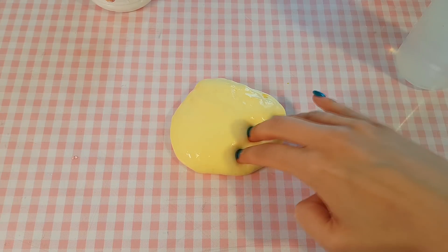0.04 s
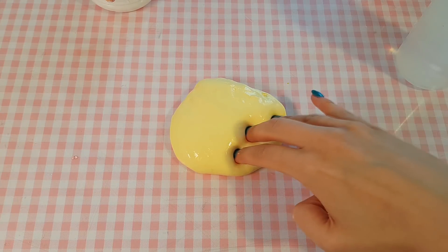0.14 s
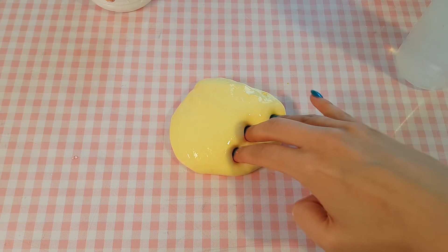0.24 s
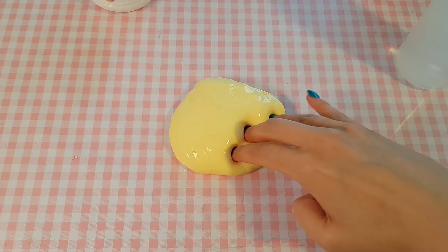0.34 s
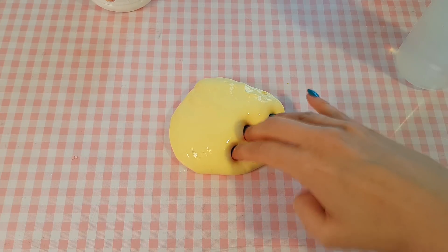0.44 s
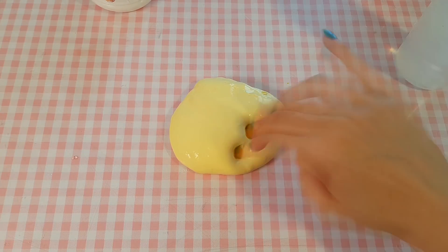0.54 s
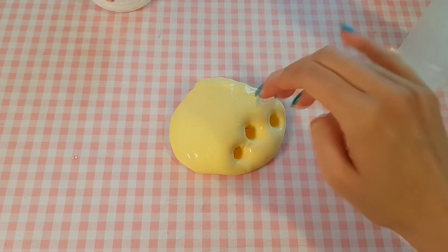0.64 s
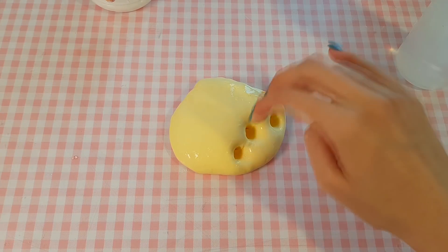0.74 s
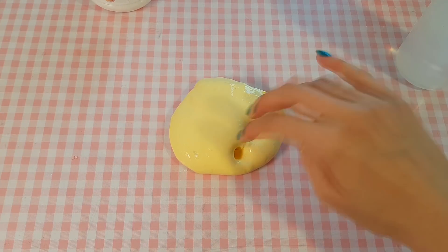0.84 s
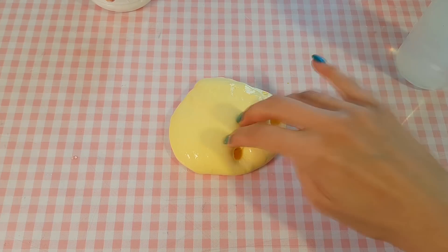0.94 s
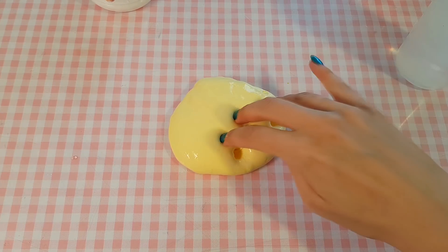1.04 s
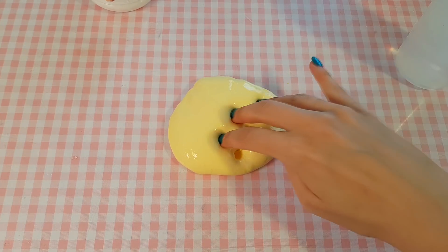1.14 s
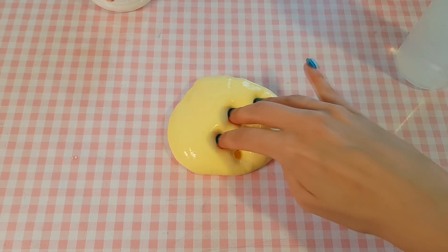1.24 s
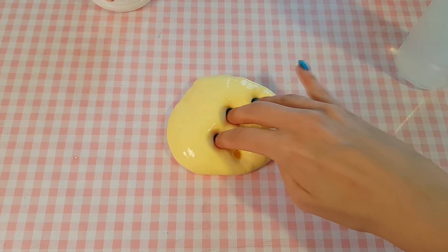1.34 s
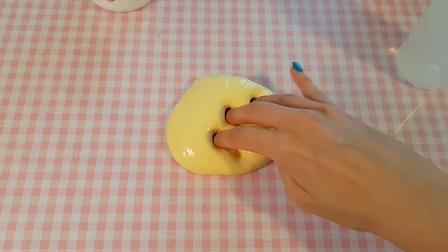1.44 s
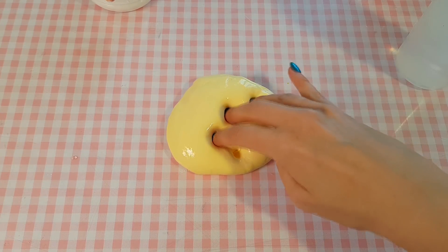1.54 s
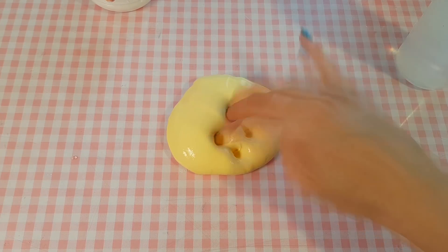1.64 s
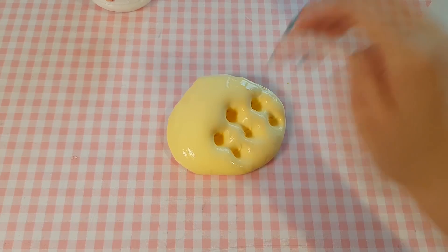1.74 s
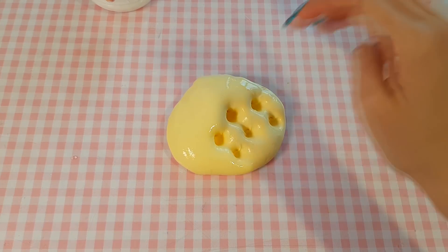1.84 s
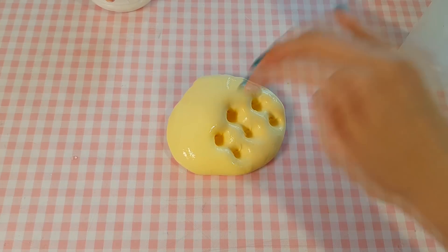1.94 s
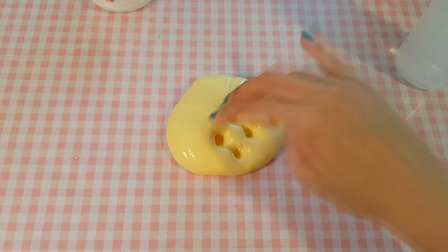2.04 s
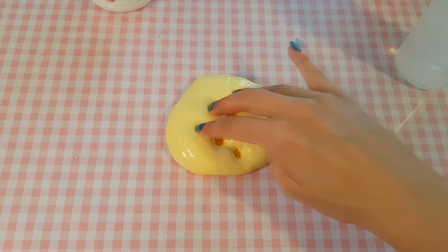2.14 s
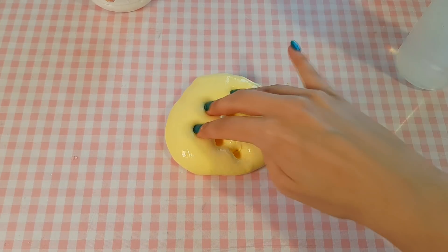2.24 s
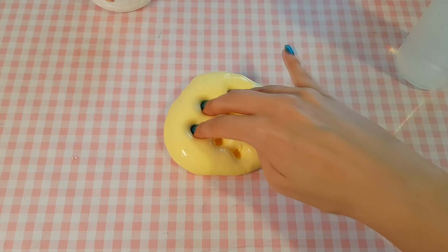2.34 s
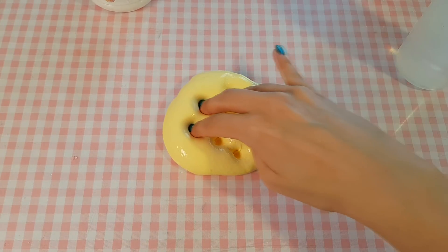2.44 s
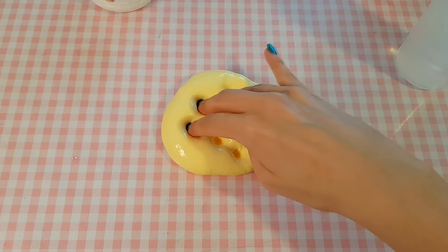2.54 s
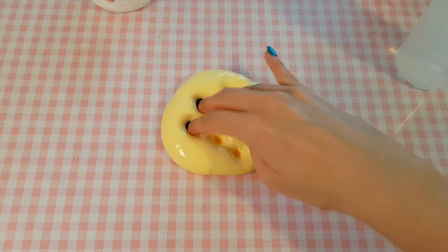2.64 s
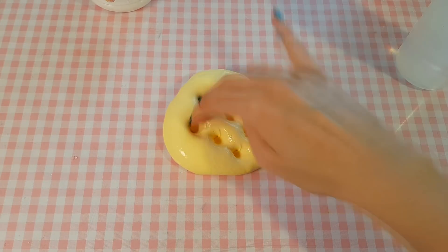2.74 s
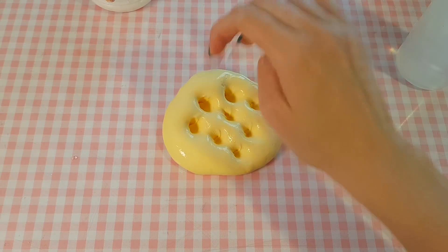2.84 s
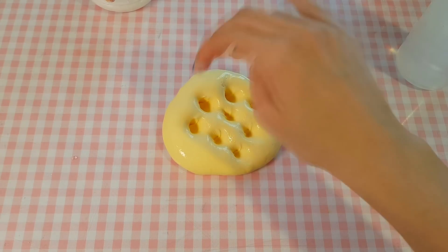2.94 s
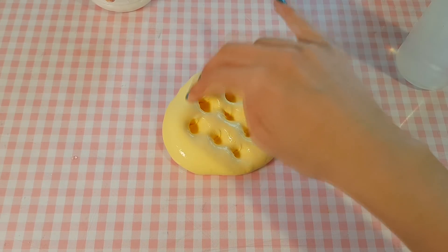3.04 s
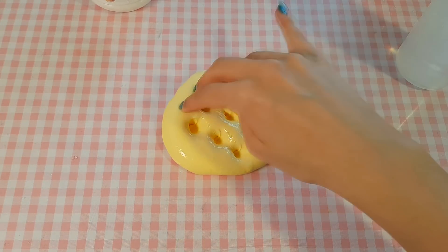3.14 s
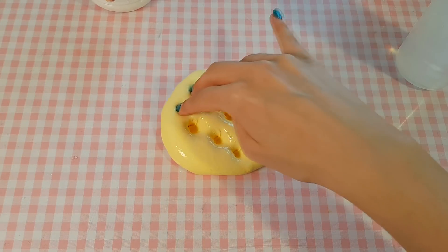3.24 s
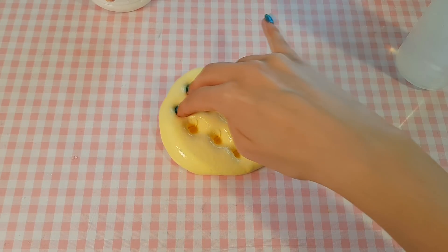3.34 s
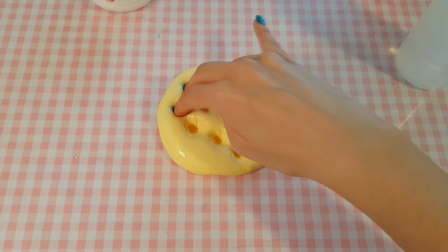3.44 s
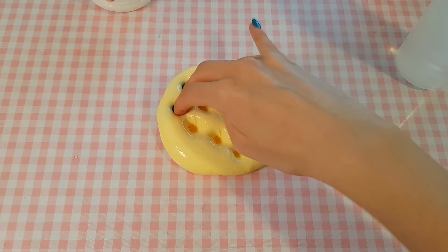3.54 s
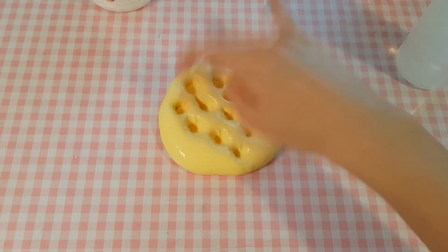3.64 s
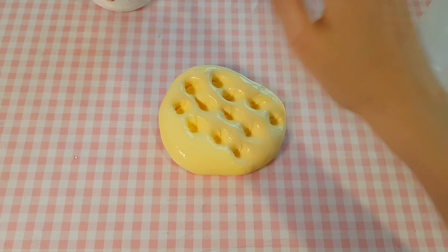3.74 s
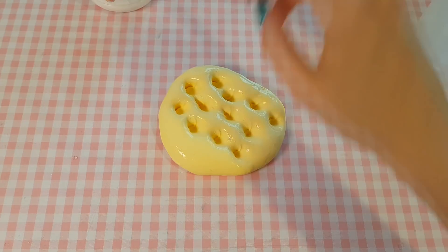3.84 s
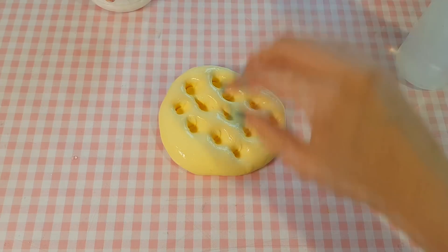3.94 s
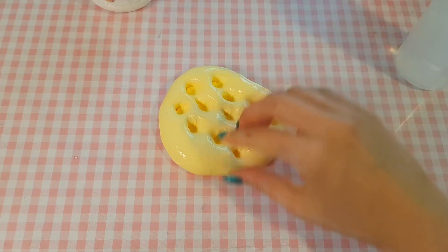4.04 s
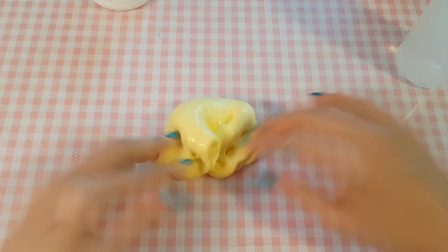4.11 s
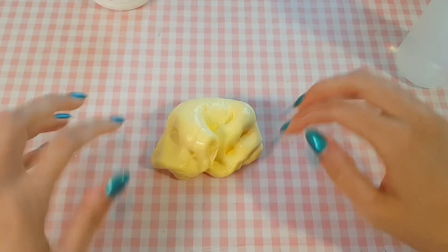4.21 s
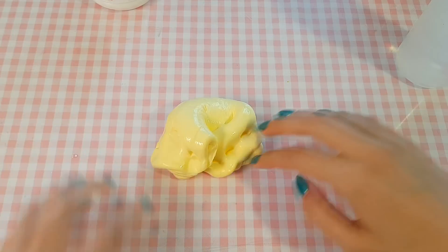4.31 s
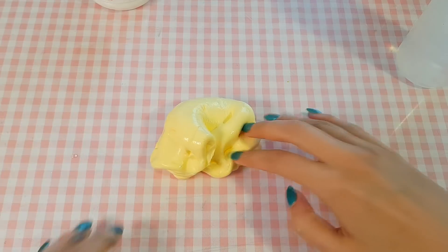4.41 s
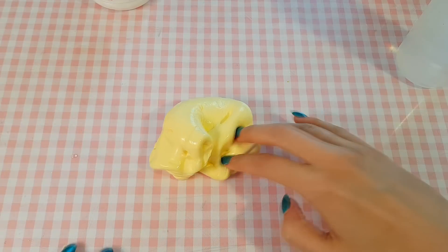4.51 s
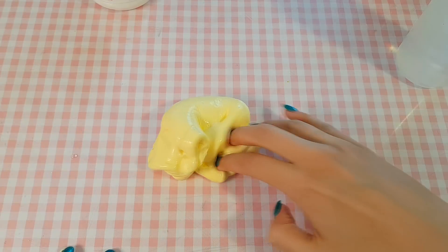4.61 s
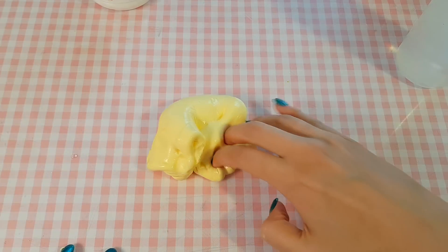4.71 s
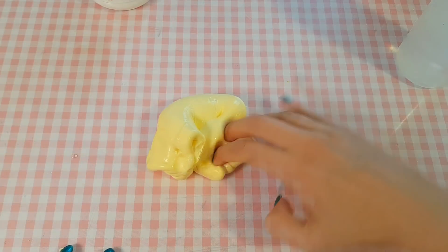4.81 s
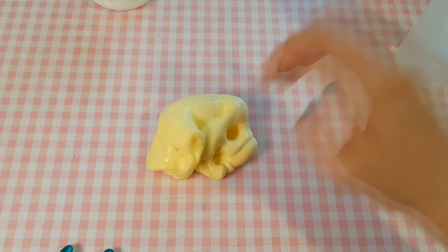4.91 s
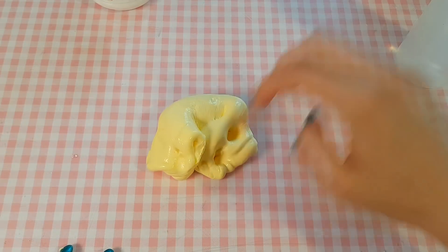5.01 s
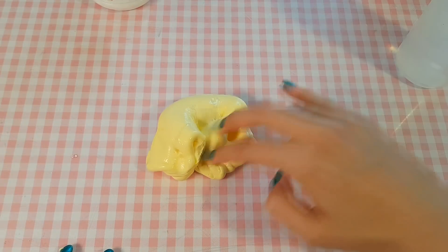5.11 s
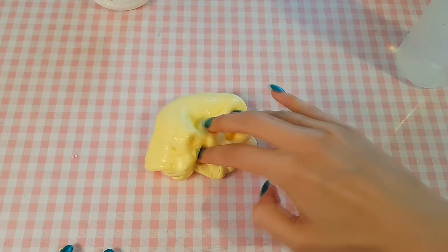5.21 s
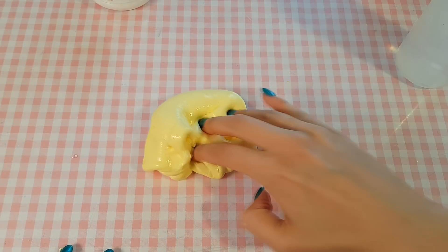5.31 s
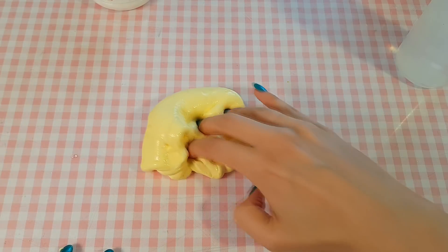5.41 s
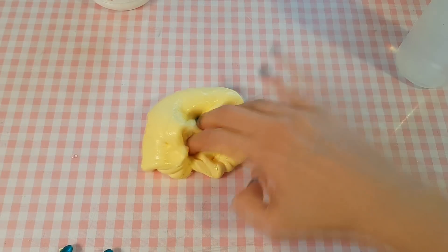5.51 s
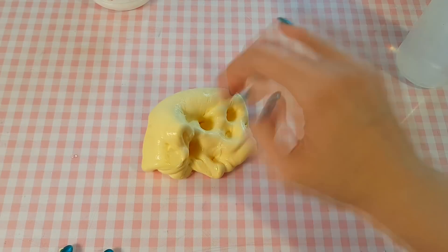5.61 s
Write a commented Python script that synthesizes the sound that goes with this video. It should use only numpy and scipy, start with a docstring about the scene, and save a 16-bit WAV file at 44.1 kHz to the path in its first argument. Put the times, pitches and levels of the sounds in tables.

```python
"""Wet pops in quick clusters, close to a stereo microphone: fingertips pull out of thick slime on a table.
Each pull breaks the seal: films snap as filtered pulses, the hole behind rings as a short rising tone,
and the table thumps, a low swinging push with a soft thud. Skin peeling off is a crackle of spiky noise;
midway the slime is touched and folded with a little of it and a few small clicks.
A bare room answers with noise-built echoes and low modes, over a swelling rumble and faint hiss."""
import sys
import numpy as np
from scipy import signal
from scipy.fft import rfft, irfft, next_fast_len
from scipy.io import wavfile

SR = 44100
rng = np.random.default_rng(int(sys.argv[2]) if len(sys.argv) > 2 else 0)


def transcribe(u):
    """Save the signal u as a 16-bit wav file named by the first command-line argument.

    u: samples, shape (n,) or (channels, n), limited to [-1, 1]; the rate is SR.
    q: integer samples, one column per channel.
    """
    v = np.clip(np.atleast_2d(u).T, -1, 1)
    q = np.round(v * 32767).astype(np.int16)
    wavfile.write(sys.argv[1], SR, q)


N = 250047

# steady rumble of the building, relative spectrum: (frequency [Hz], level [dB])
RUMBLE_COLOUR = [(20, -24), (42, -7.5), (60, 0), (85, -8), (102, -4.5), (113, 1.5), (126, -7.5), (170, -13),
                 (200, -13.5), (232, -6.5), (280, -22), (400, -30), (900, -39.5), (2500, -62.5)]
# crests of the rumble, which swells slowly and drops away: (time [s], level [dB])
RUMBLE_SWELLS = [(.95, -66.5), (1.45, -58.5), (2.209, -55), (2.72, -65), (3.401, -62.5), (4.1, -59.5),
                 (5.36, -62.5)]
# microphone hiss, relative spectrum: (frequency [Hz], level [dB])
HISS_COLOUR = [(150, -18), (400, -3), (750, -8), (1270, -10.5), (4300, -17), (6000, -21), (7900, -25),
               (9500, -18), (11900, -7.5), (15000, -6), (16000, -14)]
# low standing waves of the room: (frequency [Hz], relative level [dB], decay by 60 dB [s])
ROOM_MODES = [(81, -5.5, 0.49), (113.4, 2, 0.65), (140.4, -8, 0.65), (168.6, -1.5, 0.5), (214, -12.5, 1),
              (233.7, -13.5, 0.98), (267.4, -7, 0.39), (347, -17, 1)]
# decay of the room's diffuse tail: (frequency [Hz], decay by 60 dB [s])
ROOM_DECAY = [(200, 0.89), (560, 0.5), (1470, 0.5652), (3880, 0.5338), (7000, 0.5636), (10200, 0.46),
              (15000, 0.26)]
# colour of the room's diffuse tail: (frequency [Hz], level [dB])
ROOM_COLOUR = [(100, 14.5), (260, -2.5), (410, -2.5), (620, 2.5), (1400, 1), (3000, 1.5), (7000, -8.5),
               (15000, -5)]
# how alike left and right are in a room field: (frequency [Hz], likeness [-1 to 1])
ROOM_LIKENESS = [(25, 1), (60, 1), (130, 0.74), (290, .75), (640, .43), (1410, -.05), (3100, -0.017)]
# the table springs back as the slime lets go:
# (time [s], level [dB], pitch [Hz], life [cycles], thud relative to the knock [dB])
TABLE_THUMPS = [ (0.536, -41.5, 77, 0.98, -9), (0.5626, -36.5, 88, 0.41, -16), (1.656, -29, 92, 0.74, -8),
                (2.755, -35, 89.5, 0.67, -10.5), (2.768, -34.5, 163, 0.59, -9), (3.631, -40, 76, 0.53, -15),
                (3.651, -30, 106.4, 1.36, -15), (4.543, -47.5, 246, 1.7, -12), (4.862, -34, 105, 0.8, -8.5),
                (5.568, -37.5, 90, 0.84, -2.5), (5.588, -54, 158, 0.84, -15), ]
# skin peeling off the slime, before a pull or at a light touch:
# (time [s], length [s], level [dB], pitch [Hz])
SKIN_PEELS = [ (0.52, .008, -63, 11000), (1.629, 0.033, -44, 1600), (2.738, 0.043, -44, 9600),
              (3.969, 0.038, -57.5, 1580), (4.125, 0.013, -53.5, 900), (4.466, 0.0034, -44.5, 10500),
              (5.45, .008, -72, 920), (5.536, 0.0086, -63, 11000), (5.561, 0.0074, -40.5, 1100), ]
# the pops of one pull share its hole: (time [s], lowest echo tone of the hole [Hz], room level [dB])
HOLE_PULLS = [(.54, 3800, 0), (1.65, 4350, -1), (2.76, 4400, 0.5), (3.65, 4380, 0.5), (4.54, 4150, -5),
              (4.86, 3280, 1), (5.56, 4100, -1)]
# films bursting: (time [s], snap level [dB], snap pitch [Hz], snap sharpness [Q],
# cavity level [dB], cavity pitch [Hz], cavity life [cycles], left over right [dB])
FILM_POPS = [ (.3997, -66, 14500, 3.3, -90, 590, .7, -2.5), (0.5278, -40, 5600, 0.87, -36.5, 810, 0.19, 0),
             (0.5403, -35.5, 8250, 3.1, -34.5, 1000, 0.23, -1),
             (.5495, -50, 8800, 0.73, -35.5, 810, 2.3, -11), (.553, -36, 6000, 1, -40, 1930, 0.13, -10),
             (1.645, -34.5, 11660, 2, -41, 970, 3.1, 8), (1.649, -36, 4750, 3.8, -34, 1003, 1.1, 13),
             (1.6561, -22, 12600, 1.5, -37.5, 1350, 0.98, -3.5), (1.664, -37, 9470, 1.2, -38, 577, 1.5, -2),
             (2.7567, -35, 8900, 1, -39, 1160, .5, 3), (2.7634, -34, 6430, 0.33, -39, 670, 2.8, -1.5),
             (2.7658, -39, 4740, 4, -38, 804, 0.42, -10), (3.631, -30, 10410, 0.84, -41, 845, 0.72, -1),
             (3.646, -28.5, 9300, 0.33, -29, 777, 2.3, 0), (3.648, -32.5, 4460, 1.4, -30, 1527, 2.6, -2),
             (3.6562, -35.5, 9370, 0.48, -30.5, 1148, 4.5, -1),
             (4.4635, -42.5, 10500, 2.5, -51.5, 1920, 0.45, -0.5),
             (4.496, -44.5, 4530, 0.69, -43.5, 1960, 1.4, 1), (4.514, -39.5, 5510, 4.7, -49, 1670, 0.33, 2),
             (4.540, -66.5, 5000, 1, -45.5, 570, 2.3, -6), (4.554, -28, 8100, 1.6, -36.5, 1333, 0.41, -5),
             (4.8473, -20.5, 10600, 3.4, -36, 1230, 0.42, -6),
             (4.8624, -19, 12000, 0.73, -31, 2844, 1.4, 10),
             (4.8653, -34, 6600, 8.7, -34.5, 748, 0.29, 0.5),
             (4.8732, -37.5, 11080, 1.3, -40.5, 595, 1.2, -0.5),
             (5.2207, -48.5, 11890, 2.4, -78.5, 673, .8, -3),
             (5.5453, -35.5, 8700, 2.2, -67, 1000, .7, 0.5), (5.5489, -35.5, 6220, 4, -50.5, 920, .8, -1),
             (5.5673, -33, 9050, 1.5, -34.5, 2450, 0.27, 6), (5.5699, -29, 6360, 0.23, -36, 1080, 0.13, -1),
             (5.5743, -45, 7600, 1, -35.5, 588, 5.3, 2), ]

RUMBLE_DB = -69.5
SWELL_RISE_S, SWELL_FALL_S = .2, 0.067  # time constants
SWELL_HZ, SWELL_Q, SWELL_BROAD_DB = 111, 4.6, -4.5  # swells favour the room's strongest low mode
HISS_DB = -72
HISS_START_DB, HISS_RISE_FROM_S, HISS_RISE_S = -4, 0.43, 0.17  # it starts lower and comes up once
BOOM_DB = -3  # the room's standing waves, relative to each knock
PEEL_Q, PEEL_TREBLE_DB, PEEL_ROOM_DB = .8, -10.5, 2  # sharpness, fine fizz, the room's answer
TOP_HZ = 16300  # the recorder's band limit


def amp(db):
    """Decibels to gain."""
    return 10 ** (np.asarray(db) / 20)


def unit(x):
    """Scale each channel to rms 1."""
    return x / np.sqrt(np.mean(x ** 2, axis=-1, keepdims=True) + 1e-20)


def burst(x):
    """Scale each channel of a click to the energy of 3 ms at rms 1."""
    return unit(x) * np.sqrt(.003 * SR / x.shape[-1])


def along(points, hz):
    """Read (frequency [Hz], value) points on a log frequency axis."""
    f, v = np.transpose(points)
    return np.interp(np.log(hz + 1), np.log(f + 1), v)


def filtered(x, response):
    """Filter x by a complex response of frequency."""
    n = x.shape[-1]
    m = next_fast_len(n + 8192)  # spare room keeps the ringing from wrapping round
    spectrum = rfft(x, m) * response(np.fft.rfftfreq(m, 1 / SR))
    return irfft(spectrum, m)[..., :n]


def resonance(f, hz, q):
    """Causal band-pass response of one resonance, gain 1 at its pitch."""
    return 1j * f * hz / q / (hz * hz - f * f + 1j * f * hz / q)


def add(track, s, sound):
    """Mix a sound into the track at time s."""
    start = round(s * SR)
    part = track[..., start:start + sound.shape[-1]]
    part += sound[..., :part.shape[-1]]


def diffuse(pair):
    """Two unrelated noises become a room field, alike mostly in the bass."""
    turn = lambda f: np.arccos(np.clip(along(ROOM_LIKENESS, f), -1, 1)) / 2
    mid, side = filtered(pair, lambda f: np.array([np.cos(turn(f)), np.sin(turn(f))]))
    return np.array([mid + side, mid - side])


def rumble_noise(colour):
    """Low noise as a room field, shaped by the rumble's spectrum and a further colour."""
    field = diffuse(rng.standard_normal((2, N)))
    return unit(filtered(field, lambda f: amp(along(RUMBLE_COLOUR, f)) * colour(f)))


def building_rumble(t):
    """The building's steady rumble, plus swells that favour one low mode of the room."""
    steady = rumble_noise(lambda f: 1)
    drone = rumble_noise(lambda f: amp(SWELL_BROAD_DB) + np.abs(resonance(f, SWELL_HZ, SWELL_Q)))
    swells = []
    for s, db in RUMBLE_SWELLS:
        away = np.maximum((s - t) / SWELL_RISE_S, (t - s) / SWELL_FALL_S)
        swells.append(amp(db) * np.exp(-away))
    return amp(RUMBLE_DB) * steady + np.max(swells, axis=0) * drone


def microphone_hiss(t):
    """The microphone's own noise, unrelated left and right."""
    hiss = unit(filtered(rng.standard_normal((2, N)), lambda f: amp(along(HISS_COLOUR, f))))
    early = np.clip(1 - (t - HISS_RISE_FROM_S) / HISS_RISE_S, 0, 1)
    return amp(HISS_DB + HISS_START_DB * early) * hiss


def background():
    """What lies behind the slime: rumble and hiss."""
    t = np.arange(N) / SR
    return building_rumble(t) + microphone_hiss(t)


def room_tail(gap_s, build_s):
    """A stereo room response: separate wall echoes at first, merging into a diffuse tail."""
    shape = (2, int(.6 * SR))
    # echoes multiply with time squared
    density = np.clip(.04 * (1 + np.arange(shape[1]) / SR / .012) ** 2, 1e-3, 1)
    echoes = rng.standard_normal(shape) * (rng.random(shape) < density) / np.sqrt(density)
    hz, t, bands = signal.stft(echoes, SR, nperseg=256)
    decay = amp(-60 * t / along(ROOM_DECAY, hz)[:, None])
    tail = signal.istft(bands * decay, SR, nperseg=256)[1]
    since = np.maximum(np.arange(tail.shape[1]) / SR - gap_s, 0)
    build = 1 - np.exp(-since / build_s)
    near_walls = 1 + 0.78 * np.exp(-since / 0.015)  # they answer most strongly
    tail = tail * build * near_walls
    field = diffuse(tail / np.linalg.norm(tail[0]))
    return filtered(field, lambda f: amp(along(ROOM_COLOUR, f)))


def in_room(sound, gap_s, build_s):
    """The room's answer to a mono sound."""
    return signal.fftconvolve(sound[None], room_tail(gap_s, build_s), axes=1)


def standing_waves(t, knock_hz):
    """The room's low modes; those near the knock's pitch tend to ring most."""
    hz, db, t60 = np.transpose(ROOM_MODES)[:, :, None]
    drive = np.abs(resonance(hz, knock_hz, 3.9)) * amp(rng.normal(0, 0.87, hz.shape))
    tones = np.sin(2 * np.pi * (hz * t + rng.random(hz.shape)))
    waves = drive * amp(db - 60 * t / t60) * tones
    return waves.sum(0) * (1 - np.exp(-t / 0.014))


def thumps():
    """The released table gives a soft, short knock that wakes the room's standing waves."""
    out, t = np.zeros((2, N)), np.arange(SR) / SR
    for s, db, hz, cycles, thud_db in TABLE_THUMPS:
        age = t * hz / cycles
        push = -np.sin(2 * np.pi * hz * t) * (age * np.exp(1 - age)) ** 2
        thud = filtered(1. * (t == 0), lambda f: resonance(f, 239.5, 1.4) ** 2)
        thud = amp(thud_db) * thud / np.abs(thud).max()
        echo = in_room(thud, gap_s=0.005, build_s=0.0067)[:, :len(t)]
        knock = push + thud + amp(BOOM_DB) * standing_waves(t, hz) + amp(4.5) * echo
        add(out, s, amp(db) * knock)
    return out


def peels():
    """Tiny strands part as skin leaves the slime: a short arch of soft crackle."""
    out, t = np.zeros((2, N)), np.arange(2048) / SR
    for s, length, db, hz in SKIN_PEELS:
        arch = np.sqrt(np.sin(np.pi * np.minimum(t / length, 1)))
        strands = rng.standard_normal(len(t)) ** 3 * arch  # cubing makes the noise spiky
        body = lambda f: resonance(f, hz, PEEL_Q) * resonance(f, hz, 0.71)
        fizz = lambda f: amp(PEEL_TREBLE_DB) * resonance(f, 4700, .4)
        crackle = amp(db) * burst(filtered(strands, lambda f: body(f) + fizz(f)))
        add(out, s, crackle)
        add(out, s, amp(PEEL_ROOM_DB) * in_room(crackle, gap_s=0.0028, build_s=0.0018))
    return out


def scattered(x, t, near_s, far_s, near_db, far_db, apart):
    """Slime, fingers and table scatter a pop on its way to each microphone."""
    shared = rng.standard_normal(len(t))
    separate = apart * rng.standard_normal((2, len(t)))
    near = unit((shared + separate) * np.exp(-t / near_s))
    far = unit(rng.standard_normal((2, len(t))) * np.exp(-t / far_s))
    direct = unit(1. * (t == 0))
    paths = direct + amp(near_db) * near + amp(far_db) * far
    return burst(signal.fftconvolve(x[None], paths, axes=1)[:, :len(t)])


def snap(t, hz, q, hole_hz, body_db, echo_db, ragged_db):
    """A film tears: a ragged pulse rings film and broad body, and the bottom of the hole echoes it."""
    ragged = amp(ragged_db) * rng.standard_normal(len(t)) * np.exp(-t / 0.0017)
    pulse = 1. * (np.arange(len(t)) == 4) + ragged
    film = lambda f: resonance(f, hz, 0.47) * resonance(f, hz, q)
    body = lambda f: amp(body_db) * resonance(f, hz, 0.21) ** 2
    hole = lambda f: 1 + amp(echo_db) * np.exp(-2j * np.pi * f / hole_hz)
    return burst(filtered(pulse, lambda f: (film(f) + body(f)) * hole(f)))


def cavity(t, hz, cycles, rise, onset_cycles, q):
    """The air in the hole swells and dies away, its pitch rising as the mouth opens."""
    age = t * hz / cycles
    pitch = hz * (1 + rise * (np.tanh(age) - .6))
    phase = 2 * np.pi * np.cumsum(pitch) / SR
    ring = np.sin(phase) * np.exp(-age) * (1 - np.exp(-t * hz / onset_cycles))
    return burst(filtered(ring, lambda f: resonance(f, hz, q)))


def film_peeling(t, hz):
    """The film crackles ever louder as it peels away just before it bursts."""
    strands = rng.standard_normal(len(t)) ** 3 * np.exp((t - t[-1]) / .0012)
    return burst(filtered(strands, lambda f: resonance(f, hz, 0.61)))


def pops():
    """Every burst film: a faint peeling, a snap and a cavity note, with the room's answer."""
    out, t = np.zeros((2, N)), np.arange(1024) / SR
    for s, snap_db, snap_hz, q, cavity_db, cavity_hz, cycles, pan_db in FILM_POPS:
        _, hole_hz, room_db = min(HOLE_PULLS, key=lambda pull: abs(pull[0] - s))  # nearest pull
        click = snap(t, snap_hz, q, hole_hz, body_db=-21, echo_db=-15, ragged_db=-19.5)
        note = cavity(t, cavity_hz, cycles, rise=0.066, onset_cycles=0.33, q=0.8)
        near_click = amp(snap_db) * scattered(
            click, t, near_s=0.00042, far_s=0.0016, near_db=5.5, far_db=5.5, apart=4.6)
        near_note = amp(cavity_db) * scattered(
            note, t, near_s=.0015, far_s=0.0065, near_db=-4.5, far_db=-0.5, apart=0.4)
        add(out, s, near_click * amp([[pan_db / 2], [-pan_db / 2]]) + near_note)
        add(out, s - t[-1], amp(snap_db - 23.5) * film_peeling(t, snap_hz))
        radiated = amp(snap_db + 2.3) * click + amp(cavity_db - 2.5) * note
        add(out, s, amp(room_db) * in_room(radiated, gap_s=0.0024, build_s=0.0043))
    return out


def scene():
    """The room, the table and the slime."""
    return background() + thumps() + peels() + pops()


def record(dry):
    """The recorder cuts off steeply above its band limit."""
    return filtered(dry, lambda f: 1 / np.sqrt(1 + (f / TOP_HZ) ** 200))


dry = scene()
out = record(dry)
transcribe(out)
```